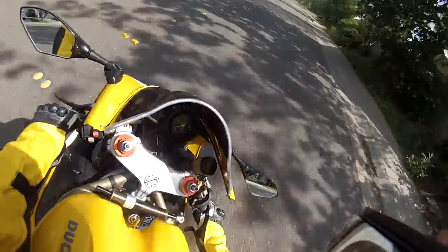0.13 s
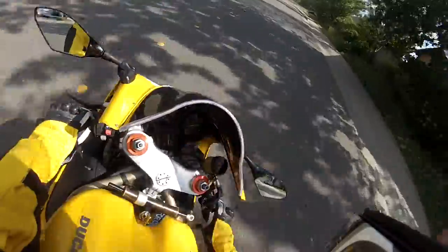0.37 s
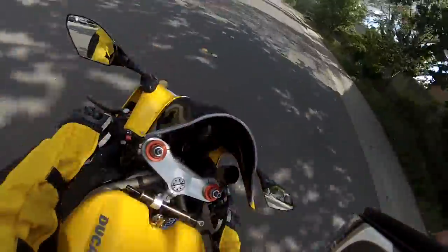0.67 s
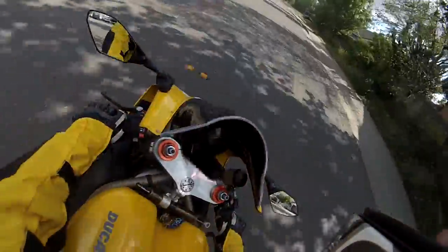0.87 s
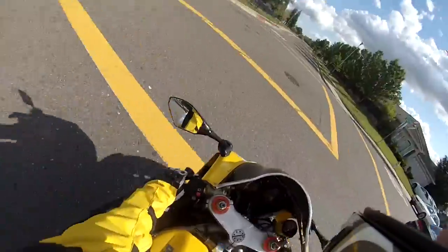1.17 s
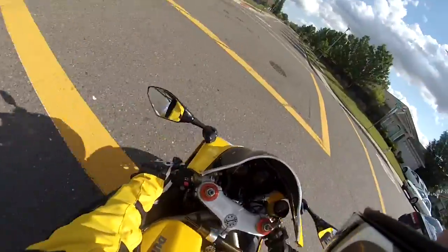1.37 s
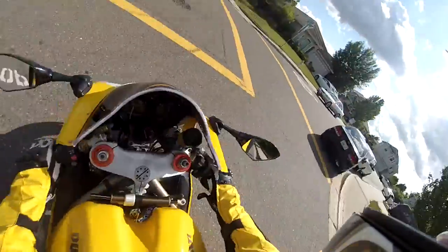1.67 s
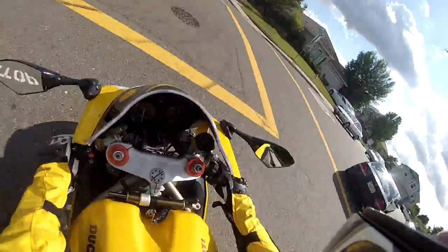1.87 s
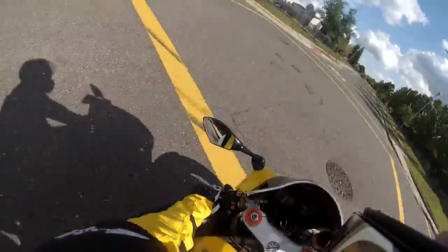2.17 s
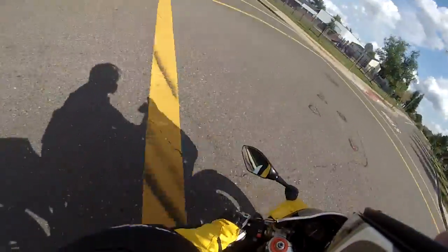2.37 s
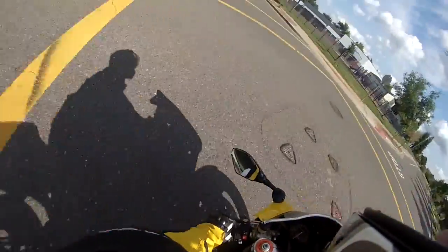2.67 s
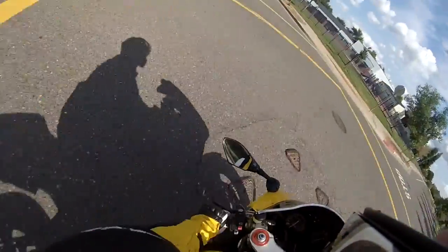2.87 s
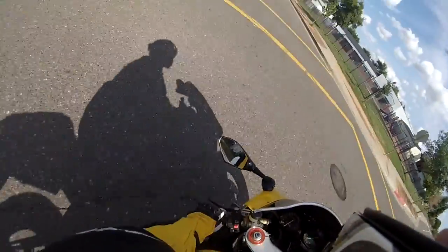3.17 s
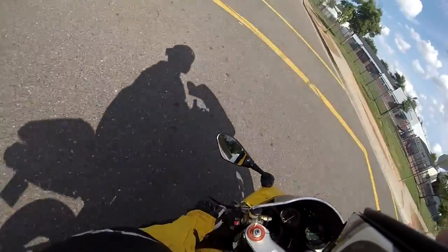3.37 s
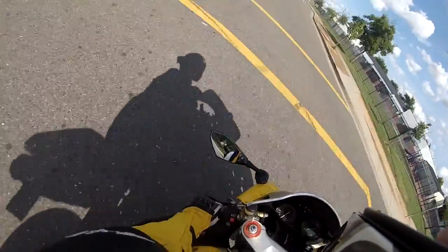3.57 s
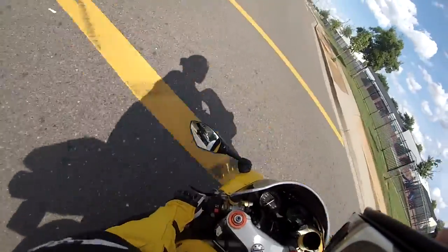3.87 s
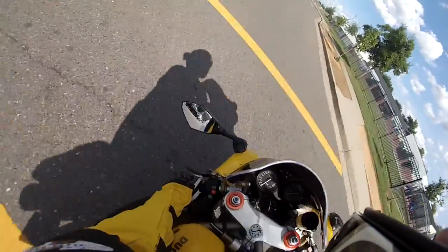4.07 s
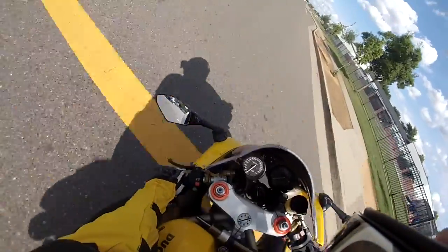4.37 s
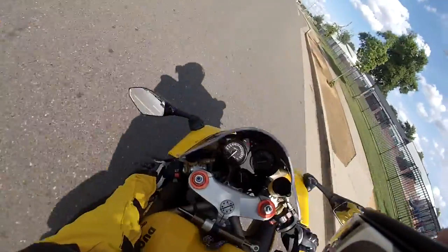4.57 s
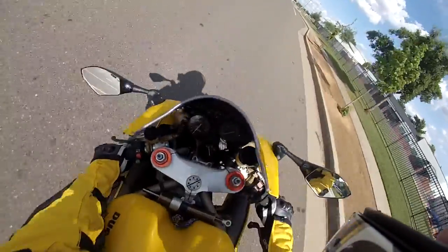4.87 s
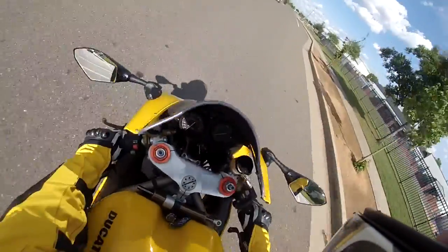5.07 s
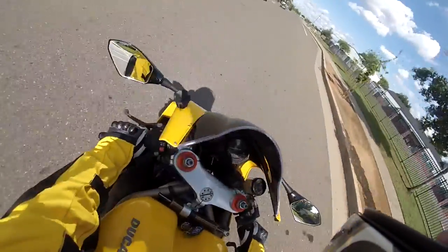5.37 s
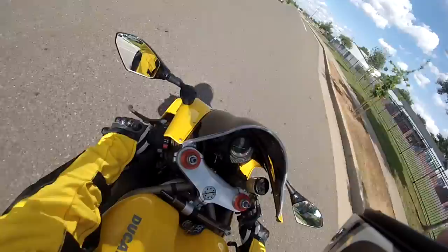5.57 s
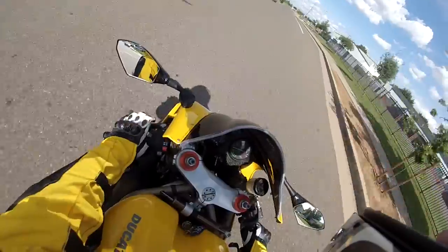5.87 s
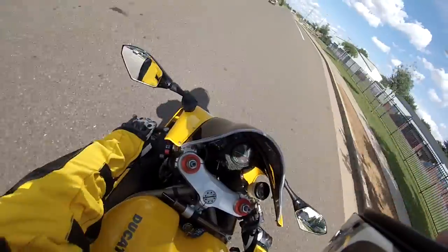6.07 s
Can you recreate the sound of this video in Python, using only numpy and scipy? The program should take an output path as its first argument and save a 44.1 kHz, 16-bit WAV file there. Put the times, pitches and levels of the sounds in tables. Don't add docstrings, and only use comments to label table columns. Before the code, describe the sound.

A V-twin motorcycle on an open road, heard from a closed camera housing on the rider's helmet, so the sound is close, boxy and dull on top. From 0 to 1 second it cruises steadily: quick uneven exhaust pulses, metallic clatter, gear whine and low wind buffeting. At about 1.04 it cuts abruptly to near idle, around ten lumpy firing cycles a second, boomy and soft, with dry clutch plates chattering. Revs step up by 1.6 and hover until 2, when a very short dull driveline knock lands. From there the engine pulls steadily in one gear, the bark hardening by 3.3. Fairing panels buzz around 3 to 4 seconds, and wind swells in lumpy gusts near 3.4 and 4.6. After 5 the pitch climbs faster, puffs blending into a rough growl, valve ticks, whine and hiss loudest at 6.2, still accelerating.

```python
import sys
import numpy as np
from scipy import signal
from scipy.fft import rfft, irfft, next_fast_len
from scipy.io import wavfile
from scipy.ndimage import uniform_filter1d, map_coordinates

SR = 44100
rng = np.random.default_rng(int(sys.argv[2]) if len(sys.argv) > 2 else 0)


def volts_from_db(level):
    exponent = np.asarray(level, float) / 20
    return 10 ** exponent


def int16_out(signal):
    q = np.round(np.clip(np.atleast_2d(signal).T, -1, 1) * 32767)
    wavfile.write(sys.argv[1], SR, q.astype(np.int16))


N = 274736

TEETH_PER_CYCLE = (24, 30, 45, 61.5, 193.5)


def unit(x):
    return x / np.sqrt(np.mean(x ** 2) + 1e-20)


def along(points, hz):
    f, v = np.transpose(points)
    return np.interp(np.log(hz + 1), np.log(f + 1), v)


def curves(spans):
    s, *cols = np.transpose(np.concatenate(spans))
    return [np.interp(np.arange(N) / SR, s, c) for c in cols]


def wobble(rate_hz):
    knots = rng.standard_normal(int(N * rate_hz / SR) + 4)
    return map_coordinates(knots, [np.arange(N) * rate_hz / SR])


def filtered(x, response):
    m = next_fast_len(N + SR // 2)
    return irfft(rfft(x, m) * response(np.fft.rfftfreq(m, 1 / SR)), m)[:N]


def modes(table):
    return lambda f: sum((-1) ** k * volts_from_db(db) * 1j * f * w / (c * c - f * f + 1j * f * w)
                         for k, (c, w, db) in enumerate(table))


def level(x, db):
    return volts_from_db(db) * x / np.sqrt(np.abs(uniform_filter1d(x ** 2, size=SR // 4)) + 1e-20)


def beats(turns, part, db, scatter_db, jitter_ms):
    at = np.flatnonzero(np.diff(np.floor(turns - part)) == 1)
    chance = rng.standard_normal((len(at), 2))
    shift = np.round(jitter_ms * SR / 1000 * chance[:, 0]).astype(int)
    at = np.clip(at + shift, 0, N - 1)
    return np.bincount(at, volts_from_db(db + scatter_db * chance[:, 1]), N)


def cruising():
    change_s = 1.035
    return np.arange(N) / SR <= change_s


def crank():
    # (time [s], speed [cycles/s])
    cruise_speed = [(0.0, 23.14), (1.03, 24.95)]
    pull_speed = [(1.04, 9.72), (1.28, 9.89), (1.42, 12.87), (1.61, 14.03), (1.89, 13.75), (2.03, 14.0),
                  (2.79, 17.9), (2.95, 19.47), (3.16, 20.23), (3.46, 22.54), (3.88, 24.41), (4.07, 25.9),
                  (5.13, 29.77), (5.84, 36.28), (6.02, 37.07), (6.23, 39.57)]
    first_firing = (.375, .94)
    before = cruising()
    speed, = curves([cruise_speed, pull_speed])
    turned_before = np.cumsum(speed * before) / SR - first_firing[0]
    turned_after = np.cumsum(speed * ~before) / SR - first_firing[1] + 30
    return speed, np.where(before, turned_before, turned_after) + 2


def wind():
    # (time [s], level [dB])
    gusts = [(0.0, -48.5), (1.03, -48.5), (1.06, -55.5), (2.6, -53), (3.4, -47), (4.0, -53), (4.6, -48.5),
             (5.3, -53.5), (6.23, -47)]
    # (frequency [Hz], density [dB per Hz])
    buffet = [(8, 7), (15, -0.5), (35, -13.5), (60, 5), (85, -6.5), (140, -13.5), (400, -24.5), (900, -42),
              (2000, -120)]
    gust_db, = curves([gusts])
    rumble = filtered(rng.standard_normal(N), lambda f: volts_from_db(along(buffet, f)))
    return level(volts_from_db(2.0 * wobble(9.7)) * rumble, gust_db)


def knock():
    # (time [s], level [dB])
    blow = (2.041, -41)
    t = np.maximum(np.arange(N) / SR - blow[0], 0)
    return -volts_from_db(blow[1] - 60 * t / .022) * np.sin(2 * np.pi * 300 * t)


def clatter_level(speed):
    # (engine speed [cycles/s], level [dB])
    clatter_by_speed = [(10, -66), (13.8, -62), (17, -62), (20, -58.5), (24, -58.5), (29, -52), (33, -48.5),
                        (39.5, -46)]
    road_rush_db = 5.7
    return along(clatter_by_speed, speed) + road_rush_db * cruising()


def panels(speed, turns):
    # (centre [Hz], width [Hz], shaking speed [cycles/s], spread [cycles/s], level over clatter [dB])
    panel_modes = [(1425, 110, 23.46, 1.6, -5), (1264, 106, 20.5, 1.3, -1), (913, 70, 29.9, 0.96, -15),
                   (924, 72, 13.9, 0.91, -9)]
    shake = volts_from_db(2.8 * np.cos(4 * np.pi * (turns - .1))) * rng.standard_normal(N)
    total = np.zeros(N)
    for hz, width_hz, rate, spread, db in panel_modes:
        ring = modes([(hz, width_hz, 0)])
        buzz = unit(filtered(shake, lambda f: ring(f) ** 2))
        total += volts_from_db(db) * np.exp(-((speed - rate) / spread) ** 2) * buzz
    return volts_from_db(clatter_level(speed)) * total


def clutch(speed):
    # (engine speed [cycles/s], level over clatter [dB])
    tank_ring = [(10, 8.5), (13, 2.5), (15, -4.5), (18, -9), (24, -21), (30, -5), (39, -3)]
    cruise_lift_db = 15.5
    tank_db = along(tank_ring, speed) + cruise_lift_db * cruising()
    chatter = volts_from_db(1.0 * wobble(28)) * rng.standard_normal(N)
    ring = modes([(659, 150, 0)])
    return level(filtered(chatter, lambda f: ring(f) ** 2), clatter_level(speed) + tank_db - 12)


def valve_ticks(turns):
    # (part of a cycle [1], level [dB])
    strikes = [(.02, -3.5), (0.141, -7), (0.297, 2.5), (0.428, -5), (.56, 4), (.66, -15.5), (.8, -5.5),
               (.92, -1)]
    ticks = sum(beats(turns, part, db, scatter_db=2.5, jitter_ms=0.023) for part, db in strikes)
    return level(ticks - ticks.mean(), 0)


def whine_levels(speed):
    # (base level [dB], resonance 1 [Hz], lift 1 [dB], resonance 2 [Hz], lift 2 [dB])
    mesh_resonances = [(-32, 380, 7, 1100, 9), (-21.5, 680, 12, 890, 6), (-31.5, 1263, 16, 1610, 14),
                       (-27.5, 1233, 17.5, 1658, 13.5), (-25.5, 4730, 2.5, 6000, 15.5)]
    cruise_load_db = [1, -7, -9, 6.5, 9.5]
    width = 0.093
    near = lambda hz, centre: np.exp(-(np.log(hz / centre) / width) ** 2)
    levels = []
    for teeth, (db, hz1, lift1, hz2, lift2), load_db in zip(TEETH_PER_CYCLE, mesh_resonances, cruise_load_db):
        lift = lift1 * near(teeth * speed, hz1) + lift2 * near(teeth * speed, hz2)
        levels.append(db + lift + load_db * cruising())
    return levels


def gear_whines(speed, turns):
    ripple_rad = 170 * .004 * np.sin(2 * np.pi * turns)
    bite = volts_from_db(3.5 * np.cos(4 * np.pi * (turns - .1)))
    whines = []
    for teeth, db in zip(TEETH_PER_CYCLE, whine_levels(speed)):
        slack_rad = min(teeth / 66, 1.15) ** 4 * wobble(110)
        tone = np.sin(2 * np.pi * teeth * turns + slack_rad + ripple_rad)
        whines.append(volts_from_db(db + 2.3 * wobble(8.2)) * bite * tone)
    return whines


def machinery(speed, turns):
    # (centre [Hz], width [Hz], level [dB])
    body_modes = [(664, 81, -9), (901, 97, -1), (1267, 186, 1), (1568, 160, 2.5), (2022, 136, 3.5),
                  (2234, 88, 3), (2526, 236, -3.5), (2960, 62, -28)]
    housing_modes = [(3170, 300, 2.5), (4080, 280, -5), (4503, 350, -6.5), (5636, 295, -5.5),
                     (6540, 1140, -11), (8300, 390, -54), (10200, 1300, -32)]
    # (frequency [Hz], level [dB])
    rattle_tone = [(250, -37), (450, 1), (650, -2), (2500, -4), (3300, -11), (4200, -14), (8000, -57)]
    hiss_tone = [(1500, -30), (2600, 10), (3200, -5.5), (7200, -5), (8200, -10), (13000, -14)]
    # (engine speed [cycles/s], level under clatter [dB])
    hiss_under = [(10, 9.5), (14, 10.5), (20, 12.5), (27, 11), (39, 9.5)]
    cruise_dull_db = -0.4
    clatter_db = clatter_level(speed)
    hiss_db = clatter_db - along(hiss_under, speed) - cruise_dull_db * cruising()

    pulse_db = np.cos(2 * np.pi * (turns - .2)) + 1.0 * np.cos(4 * np.pi * (turns - .15))
    pulse = volts_from_db(pulse_db + 0.24 * wobble(13))
    pulse = pulse ** ((22 / speed) ** 0.39)
    rush = level(pulse * rng.standard_normal(N), 0)
    moving = rush + volts_from_db(-9.5) * valve_ticks(turns)
    *coarse, fine = gear_whines(speed, turns)

    cover = modes([(4600, 200, 2), (5780, 260, 2)])
    sung = filtered(fine, lambda f: cover(f) ** 2)
    body, housing = modes(body_modes), modes(housing_modes)
    clatter = filtered(moving + pulse * sum(coarse), lambda f: volts_from_db(along(rattle_tone, f)) * body(f))
    hiss = filtered(moving + sung, lambda f: volts_from_db(along(hiss_tone, f)) * housing(f))
    return level(clatter, clatter_db) + level(hiss, hiss_db)


def exhaust(speed, turns):
    # (time [s], level [dB])
    throttle = [
        [(0.0, -52.5), (0.3, -51), (1.03, -52)],
        [(1.04, -61.5), (1.25, -63), (1.5, -60.5), (1.8, -63.5), (2.0, -61.5), (2.25, -55.5), (2.75, -52.5),
         (3.3, -49), (4.25, -49.5), (4.8, -50.5), (5.6, -48), (6.23, -48.5)],
    ]
    # (engine speed [cycles/s], boom over bark [dB])
    boom_over_bark = [(10, 7), (14, 6.5), (18, 2), (21, 2.5), (24, -2.8), (29, -1.5), (39, -5)]
    # (engine speed [cycles/s], share [1])
    header_echo = [(10, 0.67), (14, 0.69), (23, 0.66), (28, 0.64), (33, 0.17), (39, 0.026)]
    silencer_echo = [(10, 0.2), (15, 0.4), (21, 0.13), (27, 0.4), (39, 0.1)]
    # (engine speed [cycles/s], lead [part of a cycle])
    advance = [(10, .045), (13.5, .025), (20, 0), (39, -.01)]
    # (frequency [Hz], level [dB])
    bark_tone = [(60, -21), (120, 2.5), (190, 5.5), (350, 2.5), (400, -3), (450, -4), (600, -17),
                 (900, -45), (1500, -120)]
    # (centre [Hz], width [Hz], level [dB])
    silencer_modes = [(48.5, 15.3, 3.5), (122.5, 44, 2), (186.6, 43, -6.5)]
    v_gap = .392
    scatter_db, jitter_ms = .7, .09

    bark_db, = curves(throttle)
    boom_db = bark_db + along(boom_over_bark, speed)
    header = along(header_echo, speed)
    silencer = along(silencer_echo, speed)
    turns = turns + along(advance, speed)
    front = beats(turns, 0, 0, scatter_db, jitter_ms)
    front = front * np.clip(speed / 18, 0, 1) ** 2.1
    puffs = front + beats(turns, v_gap, -2.0, scatter_db, jitter_ms)

    def late(x, ms):
        return filtered(x, lambda f: volts_from_db(along(bark_tone, f)) * np.exp(-2j * np.pi * f * ms / 1000))

    bark = late(puffs, 0) - 0.7 * late(puffs, -2.0)
    bark += late(header * puffs, 3.214) - 0.46 * late(header * puffs, 5.235)
    bark += late(silencer * puffs, 13.17) + 0.95 * late(silencer * puffs, 19)
    soft = np.clip((-48.5 - bark_db) / 7, 0, 1)
    bark = (1 - soft) * bark + soft * filtered(bark, lambda f: np.exp(-(f / 310) ** 4))

    pipe = modes(silencer_modes)
    boom = filtered(puffs, lambda f: pipe(f) * np.exp(-(f / 260) ** 2))
    return level(bark, bark_db) + level(boom, boom_db)


def scene():
    speed, turns = crank()
    engine = clutch(speed) + machinery(speed, turns) + exhaust(speed, turns)
    return (wind() + knock() + panels(speed, turns) + engine)[None]


def top_cut(x):
    return signal.sosfilt(signal.butter(12, 12750, fs=SR, output="sos"), x)


def record(dry):
    sensor_db = -85
    return top_cut(dry + volts_from_db(sensor_db) * rng.standard_normal(dry.shape))


dry = scene()
out = record(dry)
int16_out(out)
```